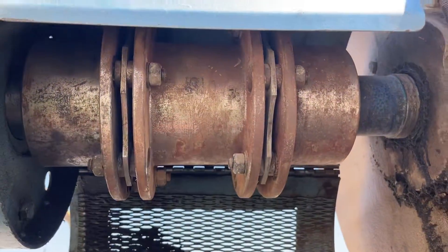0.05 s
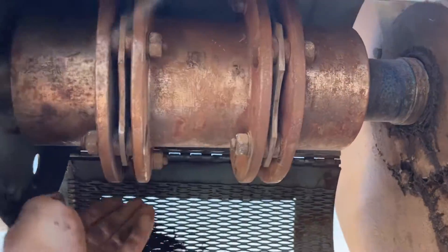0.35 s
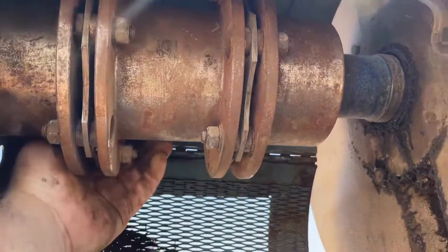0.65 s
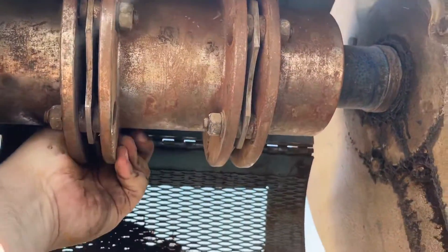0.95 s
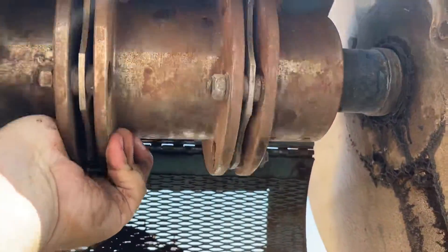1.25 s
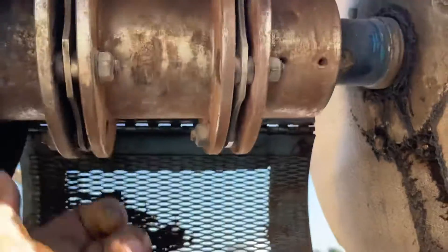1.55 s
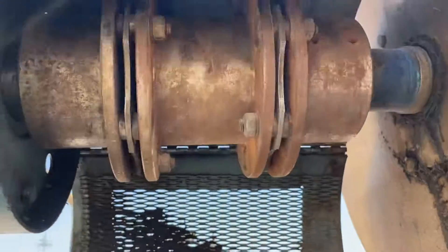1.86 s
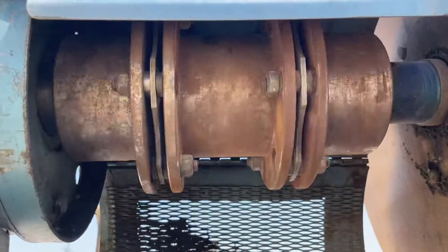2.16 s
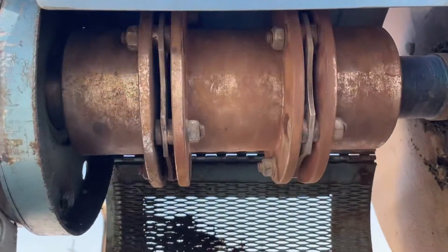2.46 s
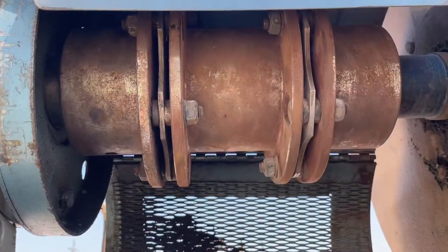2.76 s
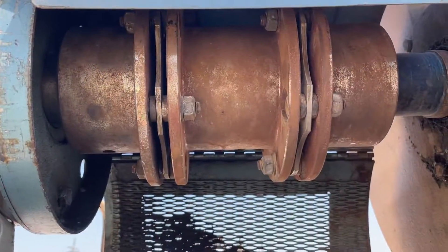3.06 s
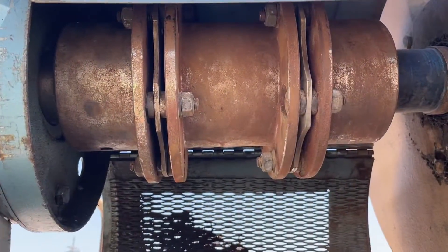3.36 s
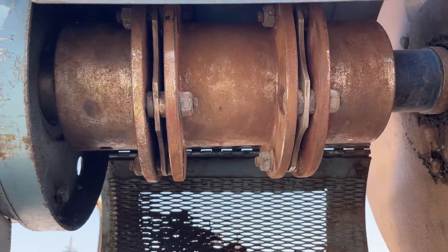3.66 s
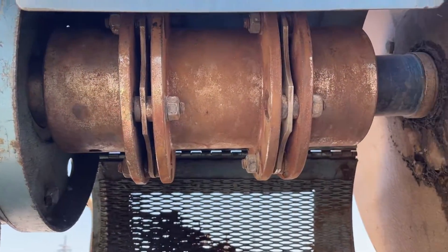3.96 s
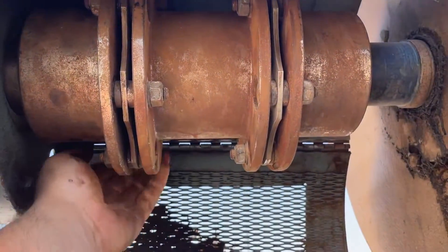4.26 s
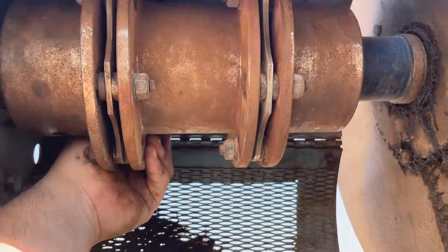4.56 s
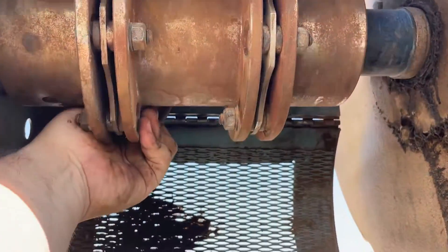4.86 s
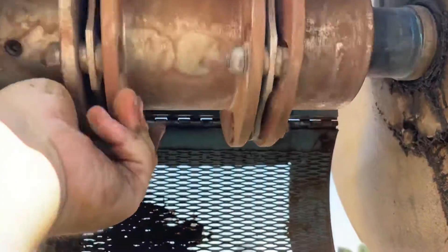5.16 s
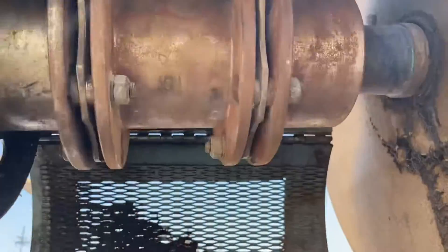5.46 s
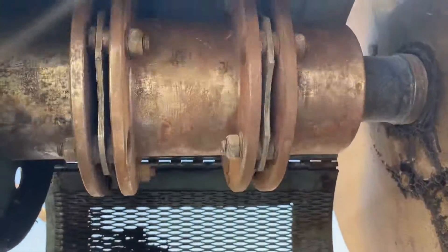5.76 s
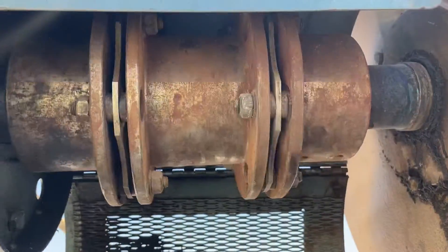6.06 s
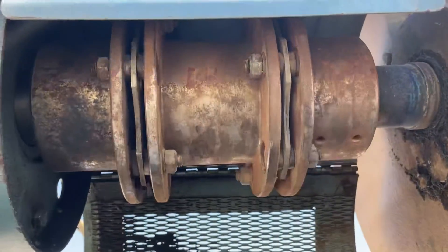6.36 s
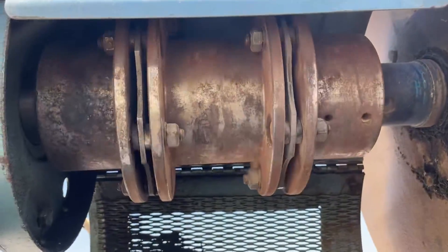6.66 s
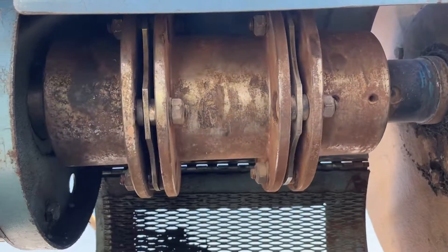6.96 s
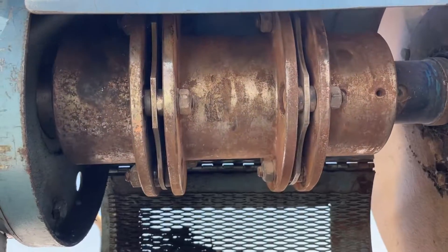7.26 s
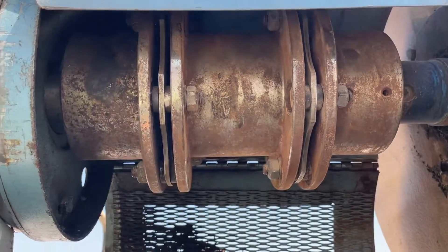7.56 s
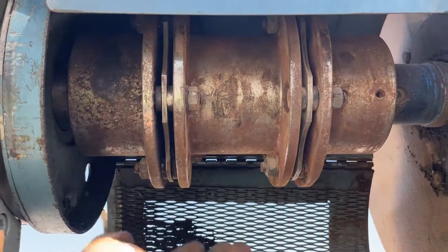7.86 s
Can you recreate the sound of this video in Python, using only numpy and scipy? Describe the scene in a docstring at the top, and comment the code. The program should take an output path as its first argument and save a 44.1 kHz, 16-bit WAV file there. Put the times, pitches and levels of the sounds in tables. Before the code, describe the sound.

Soft rubbing and sharp steel clacks from a coupling turned by hand outdoors, over a growing low diesel rumble and faint small birds.

```python
"""Spinning a rusty shaft coupling

Outdoors, a hand twice grips a coupling and spins it. Friction of skin and sleeve on rust makes a
rasp and excites the steel's normal modes; fingers slip off, and the loose flanges clack and ring.
A heavy diesel vehicle draws nearer, droning in exhaust harmonics over road noise. Small birds
chirp between reflecting walls, far machinery murmurs, and eddies of air bump the microphone."""
import sys
import numpy as np
from scipy import signal
from scipy.fft import rfft, irfft, next_fast_len
from scipy.io import wavfile
from scipy.ndimage import map_coordinates

SR = 44100
rng = np.random.default_rng(int(sys.argv[2]) if len(sys.argv) > 2 else 0)


def output_pcm(signal):
    """Save a mono or channel-first signal as 16-bit PCM at the path in sys.argv[1].

    Samples are clipped to [-1, 1] before scaling.
    """
    pcm = np.clip(np.atleast_2d(signal).T, -1, 1) * 32767
    wavfile.write(sys.argv[1], SR, np.round(pcm).astype(np.int16))


N = 353241
TIME = np.arange(N) / SR


def amp(db):
    """Decibels to amplitude ratio."""
    return 10 ** (np.asarray(db) / 20)


def unit(x):
    """Normalisation to rms 1."""
    return x / np.sqrt(np.mean(x ** 2) + 1e-20)


def along(points, hz):
    """Interpolation of (Hz, value) points on a logarithmic frequency axis."""
    freqs, values = np.transpose(points)
    return np.interp(np.log(hz + 1), np.log(freqs + 1), values)


def curves(rows):
    """Linear interpolation in time of each column after the first."""
    times, *columns = np.transpose(rows)
    return [np.interp(TIME, times, column) for column in columns]


def wobble(rate):
    """Slow random modulation: a spline through rate knots a second."""
    return map_coordinates(rng.standard_normal(int(N * rate / SR) + 4), [TIME * rate])


def filtered(x, response):
    """Linear filtering: the spectrum times a frequency response."""
    n = x.shape[-1]
    padded = next_fast_len(n + 8192)
    return irfft(rfft(x, padded) * response(np.fft.rfftfreq(padded, 1 / SR)), padded)[..., :n]


def band(hz, centre, width):
    """Frequency response of a damped resonator."""
    return 1j * hz * width / (centre ** 2 - hz ** 2 + 1j * hz * width)


def noise(size=N):
    """Two uncorrelated white noises."""
    return rng.standard_normal((2, size))


def spread(pair, spectrum, coherence):
    """Partial coherence: two uncorrelated signals mix into coloured stereo of rms 1."""
    def response(hz):
        angle = np.arccos(np.clip(along(coherence, hz), -1, 1)) / 2
        return amp(along(spectrum, hz)) * np.array([np.cos(angle), np.sin(angle)])
    mid, side = filtered(pair, response)
    return unit(np.array([mid + side, mid - side]))


def add(track, s, sound):
    """Superposition: a sound joins a track at s seconds, cut to fit."""
    start = round(s * SR)
    sound = sound[..., max(-start, 0):]
    part = track[..., max(start, 0):][..., :sound.shape[-1]]
    part += sound[..., :part.shape[-1]]


# Distant noise at the two microphone ports. Each row: frequency in Hz, left-right coherence.
FAR_COHERENCE = [(60, 0.75), (180, 0.96), (520, 0), (13000, 0.54)]
# Murmur of machinery. Each row: frequency in Hz, relative spectral density in dB.
MACHINERY_SPECTRUM = [(70, -19.5), (170, 3), (230, -5.5), (340, -36.5), (700, -64)]


def machinery():
    """Ambient noise: far machines merge into a low, nearly steady murmur."""
    return amp(-50.5 + 1.1 * wobble(5.7)) * spread(noise(), MACHINERY_SPECTRUM, FAR_COHERENCE)


# Road noise on the approach. Each row: time in seconds, rumble level in dB, tyre level in dB.
ROAD_LEVELS = [(0, -49.5, -57), (1.8, -42.5, -55.5), (2.6, -41.5, -56), (3.4, -37, -54.5),
               (4.6, -33.5, -55), (5.9, -32.5, -51), (8, -30.5, -51.5)]
# Its two spectra. Each row: frequency in Hz, relative spectral density in dB.
RUMBLE_SPECTRUM = [(22, -49.5), (34, -18), (44, -3), (60, 4), (85, 5), (130, 0.5), (180, -8), (250, -18),
                   (400, -35.5), (800, -94.5)]
TYRE_SPECTRUM = [(150, -11.5), (250, -5), (384, -5.5), (510, -4.5), (600, -14), (730, -9), (860, -9),
                 (1450, -19.5), (1900, -19), (3200, -29), (4500, -29), (5300, -38.5), (13000, -76)]
# Hums of the road, and a very faint, thin, high tone not from the vehicle.
# Each row: centre in Hz, bandwidth in Hz, offset from rumble level in dB.
NARROW_BANDS = [(527.5, 28, -33), (727, 65, -28), (852, 49, -40.5), (11900, 280, -64)]


def road():
    """Broadband and narrowband noise: the rumble, and above it tyres, hums and a faint high tone."""
    rumble_db, tyre_db = curves(ROAD_LEVELS)
    rumble = amp(rumble_db - 1 + .68 * wobble(8)) * spread(noise(), RUMBLE_SPECTRUM, FAR_COHERENCE)
    upper = amp(tyre_db - 1 + 1.7 * wobble(3.9)) * spread(noise(), TYRE_SPECTRUM, FAR_COHERENCE)
    for centre, width, db in NARROW_BANDS:
        tone = filtered(rng.standard_normal(N), lambda hz: band(hz, centre, width) ** 2)
        upper += amp(rumble_db + db) * unit(tone)
    return rumble, upper


# The engine slows. Each row: time in seconds, cycle rate in Hz.
ENGINE_RATE = [(0, 40.5), (2.4, 39.91), (4.6, 38.69), (6, 37.48), (8, 35.6)]
# Exhaust harmonics. Each row: time in seconds, levels of harmonics 2, 3 and 4 in dB.
EXHAUST_LEVELS = [(0, -65.5, -63, -55), (2.5, -49.5, -55, -68.5), (3.1, -34.5, -40.5, -61),
                  (3.7, -36, -44.5, -67), (4.7, -36, -33, -42.5), (5.2, -29.5, -41, -58),
                  (6, -42.5, -35.5, -50), (7.1, -29.5, -35, -34.5), (8, -48, -39, -47)]
# A second deep tone that swells. Each row: time in seconds, frequency in Hz, level in dB.
BOOM_TONE = [(3, 70, -88.5), (4, 71.66, -44.5), (5.8, 67.68, -36), (6.5, 67, -30), (7.1, 69.68, -28.5),
             (8, 71.23, -31)]


def engine():
    """Harmonic series: the periodic exhaust drones, wavering through the air, beside a deep boom."""
    cycle_hz = curves(ENGINE_RATE)[0] * (1 + .004 * wobble(8))
    phase = 2 * np.pi * np.cumsum(cycle_hz) / SR
    drone = sum(amp(db + 3.06 * wobble(7)) * np.sin(order * phase + rng.uniform(0, 2 * np.pi))
                for order, db in enumerate(curves(EXHAUST_LEVELS), 2))
    boom_hz, boom_db = curves(BOOM_TONE)
    boom = amp(boom_db + .24 * wobble(4.5)) * np.sin(2 * np.pi * np.cumsum(boom_hz) / SR)
    return np.sqrt(2) * (drone + boom)


def vehicle(left_lead_s=.00042):
    """Time and level differences: the diesel arrives first on the left, but louder on the right."""
    drone = engine()
    rumble, upper = road()
    balance_db = np.interp(TIME, [4.5, 5.5], [-.7, -3.2])
    low = (drone + rumble) * amp(np.array([balance_db, -balance_db]) / 2)
    arrival = lambda hz: np.exp(1j * np.pi * hz * left_lead_s * np.array([[1], [-1]]))
    return filtered(low + upper * amp([[-.6], [.6]]), arrival)


def reverberation(x, t60):
    """Diffuse reflections decay exponentially, by 60 dB in t60 seconds, differently at each port."""
    t = np.arange(SR // 2) / SR
    tail = noise(len(t)) * amp(-60 * t / t60)
    return signal.fftconvolve(x[None], tail / np.linalg.norm(tail[0]), axes=1)[:, :len(x)]


NOTE_TOP_S = .1  # a note reaches its top pitch this far in


def note(top_hz, fall_s, start_hz=4150):
    """Frequency modulation: a warbling whistle sweeps up to its top, slides down and trails off."""
    rise_s, attack_s, drop_hz = .014, .012, 560
    trail, trail_s = .49, .14
    t = np.arange(SR // 2) / SR - NOTE_TOP_S
    warble = np.interp(t, np.linspace(t[0], t[-1], 120), rng.standard_normal(120))
    up = start_hz + (top_hz - start_hz) * np.exp(-(t / rise_s) ** 2)
    down = top_hz - drop_hz + drop_hz / (1 + np.abs(t / fall_s) ** 3)
    pitch = np.where(t < 0, up, down) * (1 + .0065 * warble)
    fading = (1.5 - trail) * np.exp(-(t / fall_s) ** 2 / 2) + trail * np.exp(-np.abs(t) / trail_s)
    envelope = np.where(t < 0, 1 / (1 + (t / attack_s) ** 2 / 2), fading)
    return np.sqrt(2) * envelope * np.sin(2 * np.pi * np.cumsum(pitch) / SR)


# A pip, then a higher, longer slur. Each row: time of the slur's top in seconds, top pitch in Hz,
# level in dB, near echo gain in dB, pip's lead in seconds, pip relative to slur in dB.
BIRD_CALLS = [(0.875, 4780, -70.5, -5, .16, -12), (1.626, 4730, -68.5, -3, .16, -10),
              (2.275, 4776, -61, -2.5, .155, -4.5), (3.007, 4770, -65.5, -1, 0.15, -4),
              (3.601, 4750, -65.5, 0, .153, -2.5), (4.327, 4870, -67.5, -8, .172, 2.5),
              (4.959, 4700, -68.5, -6, 0.18, 6), (5.801, 4693, -57.5, -19, .18, -11),
              (6.492, 4850, -66.5, -2.5, .15, -6), (6.594, 4900, -68.5, -21.5, 0.17, -6.5),
              (7.247, 4720, -74.5, -1, .15, -9), (7.345, 4760, -75, -17, .14, -7.5)]
# A second bird. Each row: time of the top in seconds, top pitch in Hz, fall in seconds, level in dB.
BIRD_WHISTLES = [(0.188, 6350, 0.036, -73), (3.109, 6610, .08, -79.5)]


def birds(near_wall_s=.046, far_wall_s=.076):
    """Echo and scattering: two walls repeat the birdsong, and nearby pipes and walls blur it."""
    song = np.zeros(N)
    for s, top_hz, db, echo_db, lead_s, pip_db in BIRD_CALLS:
        pip = amp(db + pip_db) * note(top_hz - 160, fall_s=.014)
        slur = amp(db) * note(top_hz, fall_s=.035)
        for top_s, chirp in (s - lead_s, pip), (s, slur):
            add(song, top_s - NOTE_TOP_S, chirp)
            add(song, top_s - NOTE_TOP_S + near_wall_s, amp(echo_db) * chirp)
    for s, top_hz, fall_s, db in BIRD_WHISTLES:
        add(song, s - NOTE_TOP_S, amp(db) * note(top_hz, fall_s, start_hz=top_hz - 400))
    out = song + amp(-5.5) * reverberation(song, t60=.1)
    add(out, far_wall_s, amp(-15) * song)
    yard_tail = filtered(reverberation(song, t60=.55), lambda hz: band(hz, 4300, 800))
    return out + amp(-7) * yard_tail


# Soft thuds. Each row: centre time in seconds, level in dB, pitch in Hz.
MICROPHONE_BUMPS = [(0.457, -40, 176), (1.343, -40.5, 215), (1.39, -45, 320), (1.44, -43, 167),
                    (1.87, -33, 119), (1.938, -33.5, 155), (2.258, -30.5, 87.4), (4.088, -25.5, 97),
                    (4.635, -29, 156), (4.835, -28.5, 183), (4.885, -22.5, 87), (5.28, -38.5, 300),
                    (7.756, -30.5, 136)]


def bumps(half_width_cycles=2.58):
    """Pressure fluctuations: eddies and handling thud on the microphone; the lower, the longer."""
    out, t = np.zeros((2, N)), np.arange(SR // 2) / SR - 1 / 4
    for s, db, pitch_hz in MICROPHONE_BUMPS:
        common, side = noise(len(t))
        swell = np.exp(-(t * pitch_hz / half_width_cycles) ** 2 / 2)
        hump = lambda hz: (hz / pitch_hz) ** 1.5 / (1 + (hz / (1.25 * pitch_hz)) ** 6)
        thud = swell * filtered(np.array([common + .16 * side, common - .11 * side]), hump)
        add(out, s + t[0], amp(db) * unit(thud) * np.sqrt(np.mean(swell ** 2)))
    return out


# Knocks on the coupling and its guard. Each row: start in seconds, level in dB, pitch in Hz,
# tick relative to tone in dB.
KNOCKS = [(.2905, -44.5, 780, -5), (1.273, -47, 1000, -1), (1.318, -47.5, 895, -2), (1.3438, -36.5, 540, 2),
          (1.994, -44.5, 920, -15), (2.027, -41.5, 823, -7), (5.2644, -34.5, 654, -18),
          (5.85, -47.5, 799, -10), (7.313, -46.5, 852, -10), (7.9203, -40.5, 700, 0),
          (7.972, -45.5, 806, -8)]


def taps(tone_t60=.036, crack_t60=.024):
    """Damped free vibration: a sharp tick of contact leaves a brief tone and a soft crack."""
    out, t = np.zeros((2, N)), np.arange(SR // 8) / SR
    tick = filtered(1.0 * (t == 0), lambda hz: band(hz, 1280, 1420) ** 3)
    tick /= np.abs(tick).max()
    for s, db, pitch_hz, tick_db in KNOCKS:
        detune = 1 + rng.normal(0, .1, (2, 1))
        tone = amp(-60 * t / tone_t60) * np.sin(2 * np.pi * pitch_hz * t * detune)
        hiss = unit(filtered(noise(len(t)), lambda hz: band(hz, 1100, 1400) ** 2))
        crack = amp(-10 - 60 * t / crack_t60) * hiss
        add(out, s, amp(db + 4) * (tone + crack + amp(tick_db) * tick))
    return out


# The coupling's resonances. Each row: frequency in Hz, bandwidth in Hz, relative level in dB.
STEEL_MODES = [(2075, 45, 1), (2235, 60, -4), (2462, 22, 3), (2620, 60, -5), (2860, 100, 0), (3780, 28, 3),
               (3975, 60, -5), (4695, 50, -7), (5095, 35, -8), (6062, 16, -5), (6810, 60, -12)]


def steel(force):
    """Modal superposition: each point of contact weights the coupling's modes anew."""
    weights = amp(rng.normal(0, 2.2, len(STEEL_MODES)))
    modes = lambda hz: sum(weight * amp(db) * band(hz, centre, width)
                           for weight, (centre, width, db) in zip(weights, STEEL_MODES))
    return unit(filtered(force + .4 * force[::-1], modes))  # the ports share part of the ring


def grit(size, rate, spread_db):
    """Shot noise: rust grains catch the skin as tiny uneven impulses, about rate a second."""
    caught = rng.random(size) < rate / SR
    return unit(noise(size) * caught * amp(spread_db * np.minimum(rng.exponential(size=size), 4)))


# Skin rubbing on rust. Each row: frequency in Hz, relative spectral density in dB.
SKIN_SPECTRUM = [(200, -1.5), (500, 8.5), (1400, 5.5), (2500, 0.5), (4000, 3.5), (5500, 0.5), (7200, -0.5),
                 (10000, -7.5), (12500, -18.5), (14000, -25)]
# Close sounds at the two ports. Each row: frequency in Hz, left-right coherence.
NEAR_COHERENCE = [(200, .65), (700, 0.32), (1500, 0.59), (2500, 0.5), (5300, 0.32), (7000, 1), (11500, 1)]


def rasp(force, treble_db, ripple_db=2.8):
    """Friction noise: the gaps between fingers and flanges colour each scrape differently."""
    knots_hz = np.linspace(0, SR / 2, 128)
    colour_db = ripple_db * rng.standard_normal(len(knots_hz))
    colour_db += treble_db * np.clip(knots_hz / 5000 - 1, 0, 1)
    scrape = spread(force, SKIN_SPECTRUM, NEAR_COHERENCE)
    return filtered(scrape, lambda hz: amp(np.interp(hz, knots_hz, colour_db)))


def stroke(judder, s, db, swell_s, fade_s, ring_db, treble_db):
    """Forced vibration: skin judders over fine rust and coarse crumbs and drives the steel."""
    out, t = np.zeros((2, N)), np.arange(-.35, .45, 1 / SR)
    roundness = 1.23  # 1 is a pointed swell, 2 a bell-shaped one
    envelope = np.exp(-np.maximum(-t / swell_s, t / fade_s) ** roundness)
    pressure = amp(db) * envelope * np.interp(s + t, TIME, judder)
    fine = grit(len(t), rate=7000, spread_db=.8)
    coarse = grit(len(t), rate=150, spread_db=1)
    force = pressure * (fine + .25 * coarse)
    sound = rasp(force, treble_db) + amp(ring_db) * steel(force) * amp([[.8], [-.8]])
    add(out, s + t[0], pressure.std() * sound)
    return out


# Hand and sleeve move and rustle. Each row: start in seconds, end in seconds.
RUSTLE_SPANS = [(1.1, 1.845), (4.2, 5.55)]
# Skin slides or a sleeve brushes by. Each row: peak time in seconds, level in dB, swell in seconds,
# fade in seconds, ring relative to scrape in dB, treble gain in dB.
HAND_SLIDES = [(.06, -55.5, 0.15, 0.2, -8.5, 1.5), (.364, -57.5, 0.028, 0.072, 0.5, 7.5),
               (.435, -52.5, .058, 0.053, -9.5, 0), (.66, -59.5, 0.24, 0.061, -14, 0.5),
               (1.028, -58, 0.073, 0.065, -11, 3.5), (1.345, -48, .115, 0.1, -6, 5.5),
               (2.26, -59, 0.058, .19, -11.5, -5.5), (3.14, -59.5, .06, 0.082, -20, -11),
               (3.93, -60.5, 0.12, .13, -13.5, 2.5), (4.41, -58.5, 0.13, 0.15, -1.5, 11),
               (4.84, -58, 0.09, 0.1, -11, 4), (5.03, -55, 0.12, 0.083, -13.5, 6.5),
               (5.23, -48, 0.12, .046, -4.5, 10), (5.67, -60.5, .04, 0.07, -15.5, 4),
               (5.96, -62, .08, .2, -14, 2.5), (7.87, -56.5, 0.14, 0.2, -9.5, 5)]
# Sudden scuffs, loudest where a finger leaves a flange. Each row: peak time in seconds, level in dB,
# fade in seconds, treble gain in dB.
FINGER_SLIPS = [(.757, -53.5, 0.045, 12.5), (1.344, -40.5, .0047, 15.5), (1.389, -43.5, 0.024, 5),
                (3.688, -58.5, 0.038, 7), (4.571, -51.5, 0.018, 13.5), (4.608, -54.5, 0.024, 9),
                (5.267, -45, 0.03, 8.5), (5.296, -52.5, 0.0057, 12.5), (6.411, -60, .04, -10),
                (7.635, -54.5, .05, 1.5)]


def hand(rustle_db=-63, fade_db_per_s=49):
    """Sliding friction: slow slides and sudden slips sound over a light rustle."""
    judder = amp(1.3 * wobble(80) + 1.3 * wobble(17))
    rest_s = np.min([np.abs(TIME - np.clip(TIME, start, end)) for start, end in RUSTLE_SPANS], axis=0)
    rustle = spread(grit(N, rate=23000, spread_db=1), SKIN_SPECTRUM, NEAR_COHERENCE)
    out = amp(rustle_db - fade_db_per_s * rest_s) * judder * rustle
    for slide in HAND_SLIDES:
        out += stroke(judder, *slide)
    for s, db, fade_s, treble_db in FINGER_SLIPS:
        ring_db = -.5 + .54 * (db + 39)  # the harder the slip, the more the steel rings
        out += stroke(judder, s, db, .49 * fade_s, fade_s, ring_db, treble_db)
    return out


# A flange sings. Each row: peak time in seconds, level in dB, half-width in seconds, mode in Hz.
SINGING_MODES = [(.39, -63, 0.04, 2840), (.41, -69, 0.057, 6730), (.59, -69, 0.071, 2410),
                 (.79, -64, 0.027, 2440), (4.355, -62.5, 0.027, 2480), (4.39, -65.5, 0.15, 2070),
                 (5.285, -51.5, .025, 2470)]


def singing(width_hz=170):
    """Stick-slip excitation: a dragging fingertip feeds one mode, which swells and fades."""
    out, t = np.zeros((2, N)), np.arange(SR // 2) / SR - 1 / 4
    for s, db, half_s, mode_hz in SINGING_MODES:
        friction = spread(noise(len(t)), SKIN_SPECTRUM, NEAR_COHERENCE)
        ring = filtered(friction, lambda hz: band(hz, mode_hz, width_hz) ** 2)
        swell = np.exp(-(t / half_s) ** 2 / 2)
        add(out, s + t[0], amp(db) * unit(swell * ring) * np.sqrt(np.mean(swell ** 2)))
    return out


# The loose flanges collide. Each row: start in seconds, level in dB, centre of the blow's band in Hz.
FLANGE_IMPACTS = [(1.3448, -34.5, 2180), (1.385, -33.5, 3820), (1.389, -32.5, 3000), (5.265, -32.5, 3380)]


def clacks(contact_s=.0039, width_hz=650, crack_db=-4.5):
    """Impact excitation: steel on steel gives a dry crack, and modes near the blow's band ring on."""
    out, t = np.zeros((2, N)), np.arange(SR // 3) / SR
    for s, db, centre_hz in FLANGE_IMPACTS:
        blow = noise(len(t)) * np.exp(-t / contact_s)
        ring = steel(filtered(blow, lambda hz: band(hz, centre_hz, width_hz)))
        ring *= amp([[1.5], [-1.5]]) / np.abs(ring).max()
        crack = spread(blow, SKIN_SPECTRUM, NEAR_COHERENCE)
        crack *= amp(crack_db) / np.abs(crack).max()
        add(out, s, amp(db) * (ring + crack))
    return out


# Phase between the ports. Each row: frequency in Hz, lead of the left port in radians.
LEFT_PHASE_LEAD = [(300, 0), (1000, 1.3), (1500, 3.1), (2000, 5.3), (2400, 6.2), (3000, 7.2), (4200, 6.3),
                   (6000, 6.3), (7000, 4.9), (7800, 3.3), (8700, 3), (9800, 1.6), (11000, 0)]


def diffraction(x):
    """Diffraction: close sound bends round the microphone's housing to reach its ports out of step."""
    return filtered(x, lambda hz: np.exp(.5j * along(LEFT_PHASE_LEAD, hz) * np.array([[1], [-1]])))


def scene():
    """Superposition of sources: the hand and coupling close by, traffic and birds far off."""
    murmur = machinery()
    coupling = diffraction(hand() + singing() + clacks()) + taps()
    return coupling + bumps() + vehicle() + birds() + murmur


def record(dry, top_hz=13650, fade_s=.004):
    """Band limiting: nothing above top_hz passes, and both ends fade briefly."""
    ends = np.clip(np.minimum(TIME, TIME[-1] - TIME) / fade_s, 0, 1)
    return filtered(dry * ends, lambda hz: hz < top_hz)


dry = scene()
out = record(dry)
output_pcm(out)
```